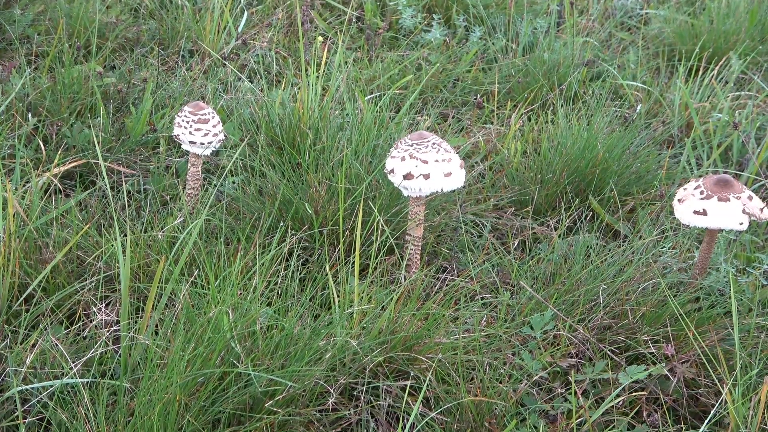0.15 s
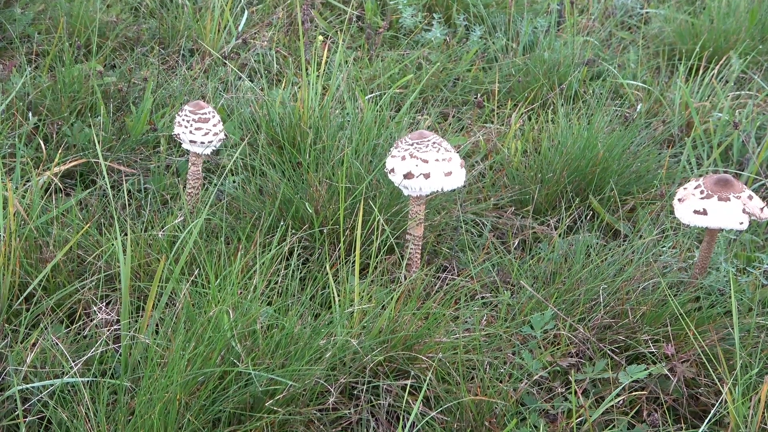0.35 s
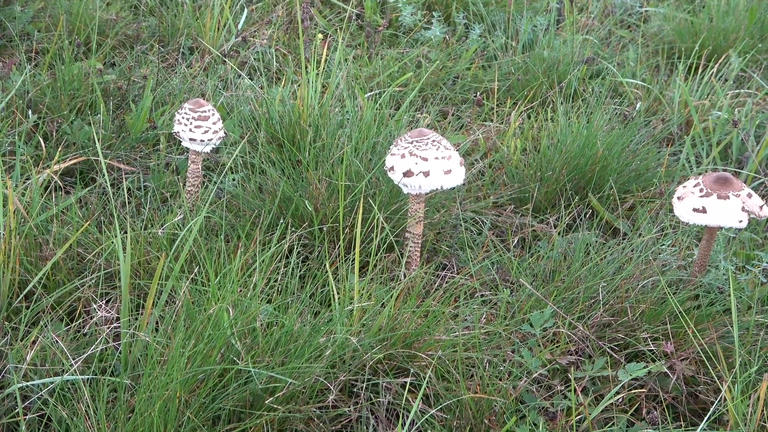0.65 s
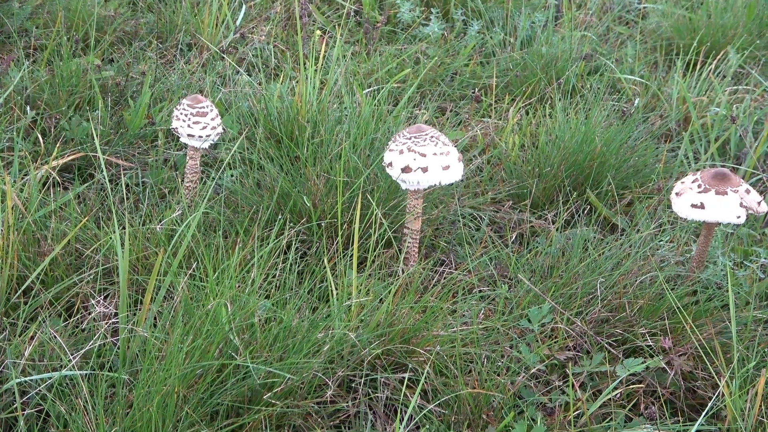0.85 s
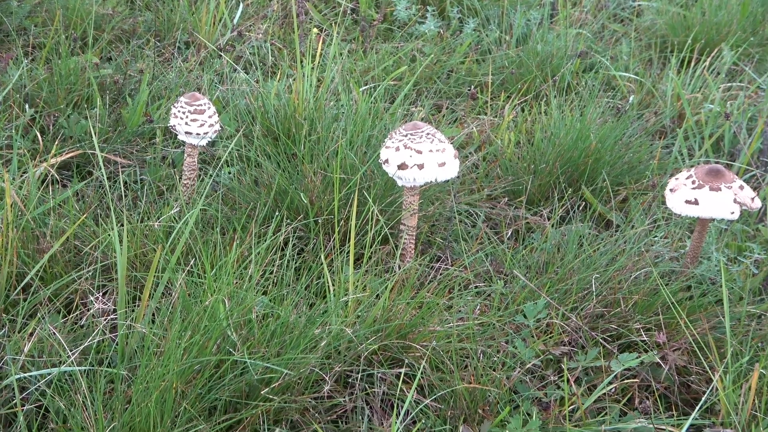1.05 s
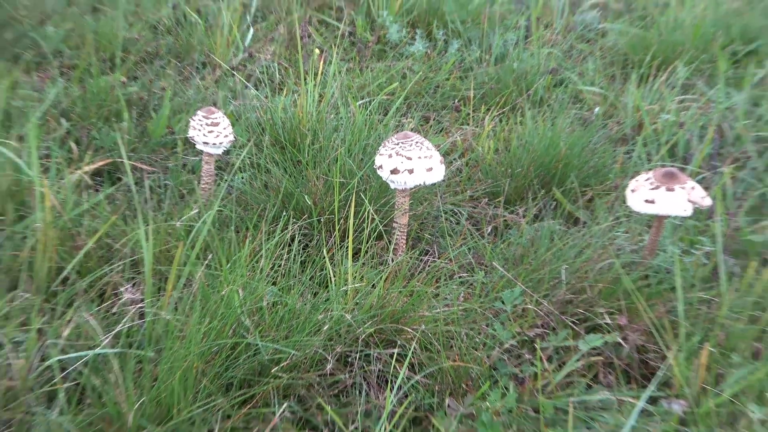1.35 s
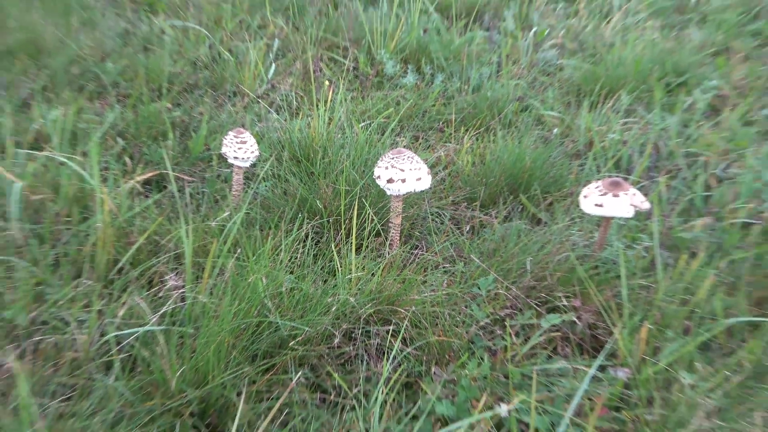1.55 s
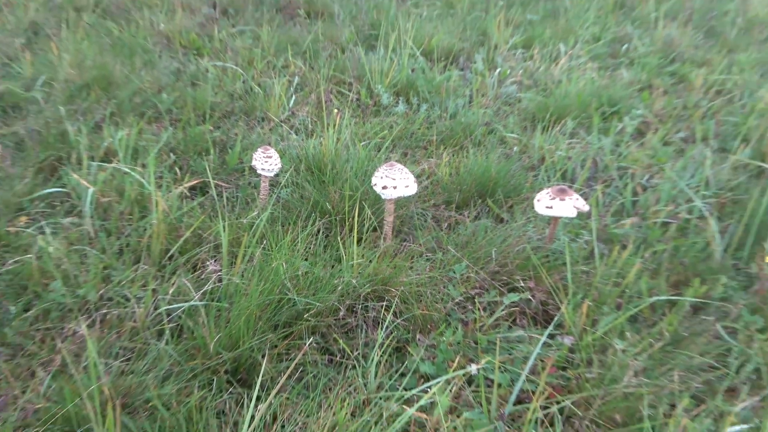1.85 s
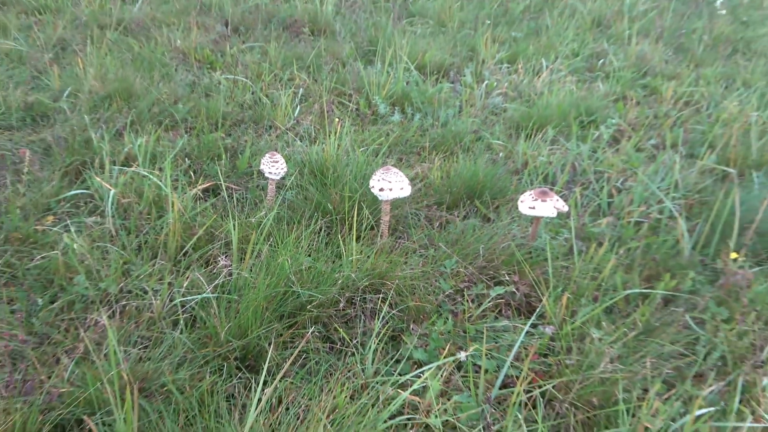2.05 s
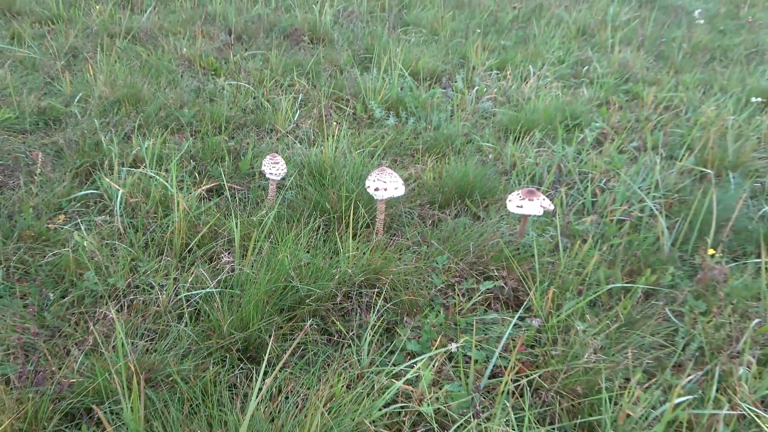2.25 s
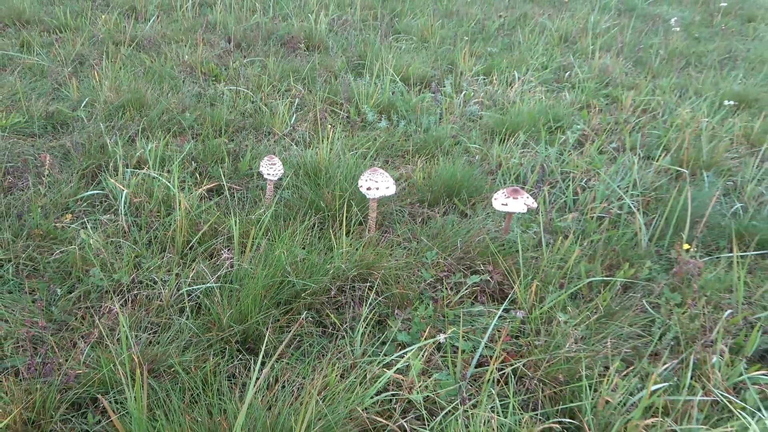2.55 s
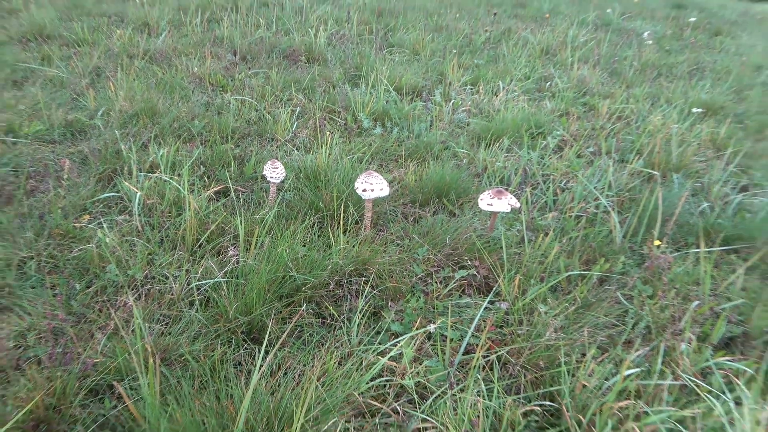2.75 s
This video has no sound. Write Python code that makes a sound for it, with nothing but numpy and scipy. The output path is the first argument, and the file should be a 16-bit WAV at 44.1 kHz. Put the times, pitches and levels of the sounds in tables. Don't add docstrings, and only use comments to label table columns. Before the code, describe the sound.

A rutting deer buck groans three times at moderate distance: about 0.2-0.7 s, 1.1-1.65 s, and a slightly longer one 2.0-2.65 s. Each is a low, hoarse rattle of 20-30 throat pulses per second, swelling then fading, with breathy rasp and a short woodland echo. Between them lie quiet meadow air, thin hiss, faint distant drone and a very faint high insect. The voice leans right.

```python
import sys
import numpy as np
from scipy import signal
from scipy.fft import rfft, irfft, next_fast_len
from scipy.io import wavfile
from scipy.ndimage import map_coordinates

SR = 44100
rng = np.random.default_rng(int(sys.argv[2]) if len(sys.argv) > 2 else 0)


def undo_db(level):
    steps = np.asarray(level, float) / 20
    return 10 ** steps


def master_out(mix):
    frames = np.transpose(np.atleast_2d(mix))
    ceiling = np.clip(frames, -1, 1)
    pcm = np.round(ceiling * 32767).astype(np.int16)
    wavfile.write(sys.argv[1], SR, pcm)


N = 127890


def unit(x):
    return x / np.sqrt(np.mean(x ** 2) + 1e-20)


def along(points, hz):
    point_hz, value = np.transpose(points)
    return np.interp(np.log(hz + 1), np.log(point_hz + 1), value)


def filtered(x, response):
    size = next_fast_len(N + SR // 2)
    spectrum = rfft(x, size)
    return irfft(spectrum * response(np.fft.rfftfreq(size, 1 / SR)), size)[..., :N]


def peaks(rows):
    def response(f):
        total = 0
        for k, (center, width, db) in enumerate(rows):
            damping = 1j * f * width
            total = total + (-1) ** k * undo_db(db) * damping / (center * center - f * f + damping)
        return total
    return response


def above(f):
    u = 1j * f / 106.3
    return (u * u / (1 + u + u * u)) ** 2


def pair(share, size=N):
    same, a, b = rng.standard_normal((3, size))
    share = np.clip(share, 0, 1)
    return np.sqrt(share) * same + np.sqrt(1 - share) * np.array([a, b])


def alike_below(x):
    return x + filtered(x[0] - x, lambda f: 1 / (1 + (f / 295) ** 4))


def wobble(rate):
    knots = rng.standard_normal(int(N * rate / SR) + 4)
    return map_coordinates(knots, [np.arange(N) * rate / SR])


def drone():
    # time_s, level_db
    hum_level = [(0.0, -45), (0.21, -47.5), (0.46, -35.5), (0.81, -57.5), (0.95, -49.5), (1.32, -48.5),
                 (1.44, -42), (1.93, -47.5), (2.38, -43.5), (2.66, -48), (2.79, -46.5), (2.9, -53.5)]
    # pitch_hz, width_hz, level_db
    hum_modes = [
        (123.3, 6.5, 1.5),
        (152, 15.4, -5),
        (217.6, 90, -18.5),
    ]
    s, db = np.transpose(hum_level)
    hum = filtered(rng.standard_normal(N), lambda f: peaks(hum_modes)(f) * above(f))
    return undo_db(np.interp(np.arange(N) / SR, s, db)) * unit(hum)


def insect():
    pitch_hz, width_hz, level_db = 5410, 6.6, -80
    line = filtered(rng.standard_normal(N), peaks([(pitch_hz, width_hz, 0)]))
    return undo_db(level_db) * unit(line)


def meadow(voice):
    # pitch_hz, level_db (per Hz)
    air_color = [(20, 8.5), (40, -6), (80, 4.5), (250, -4.5), (1000, -3.5), (1400, -10), (2000, -5.5),
                 (6000, -25.5)]
    # pitch_hz, level_db (per Hz)
    hiss_color = [(6600, -11), (7600, -13.5), (8700, -15.5), (9700, -8), (11000, 1), (12500, -13.5),
                  (13500, -25.5), (15700, -26)]
    air_db, shared_air, air_wobble_db = -52.5, 0.55, 1.1
    hiss_db, shared_hiss, hiss_wobble_db = -64, 0.71, 0.3
    swell_db, swell_s, air_swell_share = 4.5, 0.2, 0.5
    apart_hz = 12500

    air_curve = [*air_color, (6700, -28), (9000, -120)]
    air = unit(filtered(alike_below(pair(shared_air)), lambda f: undo_db(along(air_curve, f))))

    near, own = pair(shared_hiss), pair(0)
    hiss = near + filtered(own - near, lambda f: f > apart_hz)
    hiss_curve = [(3000, -120), *hiss_color]
    hiss = unit(filtered(hiss, lambda f: undo_db(along(hiss_curve, f))))

    fade = np.exp(-np.arange(SR) / SR / swell_s)
    loud = signal.fftconvolve(np.abs(voice), fade)[:N]
    swell = swell_db * np.abs(loud) / loud.max()
    air_level = air_db + air_swell_share * swell + air_wobble_db * wobble(5.686)
    hiss_level = hiss_db + swell + hiss_wobble_db * wobble(11.35)
    return undo_db(air_level) * air + undo_db(hiss_level) * hiss


def slaps():
    # time_s, slaps_so_far (count)
    rhythms = [
        [(.187, 0), (.3722, 4), (.5378, 9), (.5792, 10), (.637, 11), (.715, 13)],
        [(1.067, 0), (1.2267, 3), (1.325, 5), (1.4512, 8), (1.5435, 10), (1.6, 11), (1.66, 12)],
        [(2.033, 0), (2.136, 2), (2.222, 4), (2.3452, 8), (2.3836, 9), (2.412, 10), (2.4544, 11), (2.531, 13),
         (2.6415, 15)],
    ]
    # time_s, effort_db, chest_share_db, brightness (2 dB per octave per unit)
    efforts = [
        [(.187, -58, 13, 12), (.2335, -39.5, -1.5, 15.5), (.2794, -35, -1.5, 6), (.3258, -30.5, -3.5, 14.5),
         (.3722, -36.5, 5, -1.5), (.4066, -30, 0, 8.5), (.504, -35.5, -18.5, -2.5), (.5378, -36, -5, 1),
         (.715, -62.5, 8.5, -3)],
        [(1.067, -72, 17, -10), (1.173, -49, 5.5, 4), (1.275, -40.5, 6.5, 0), (1.325, -33, -0.5, -2.5),
         (1.368, -37, 7, -7), (1.4512, -34.5, 3.5, -3.5), (1.4966, -35, 2.5, 8), (1.6, -51, -6, 11),
         (1.66, -59.5, 11, 40)],
        [(2.033, -59.5, 11, 2), (2.083, -40, -2.5, 14), (2.136, -38.5, 1, -2), (2.18, -31.5, -0.5, 11),
         (2.345, -34.5, -1, -1.5), (2.454, -33.5, -1, 2.5), (2.531, -47, -3.5, 9), (2.586, -59.5, -13, -22),
         (2.6415, -51, 6, -0.5)],
    ]
    lead_s = 0.001515
    rows = []
    for rhythm, effort in zip(rhythms, efforts):
        s, passed = np.transpose(rhythm)
        when = np.interp(np.arange(passed[-1] + 1), passed, s) - lead_s
        t, *controls = np.transpose(effort)
        progress = (when - s[0]) / (s[-1] - s[0]) - .5
        rows += zip(when, *[np.interp(when, t, c) for c in controls], progress)
    return rows


def ring(modes, scatter_db, stretch, progress, bright_db, attack_s):
    hz, db, t60, change_db = np.transpose(modes)[..., None]
    t = np.arange(SR // 4) / SR
    luck = rng.standard_normal((2, len(modes), 1))
    db = db + change_db * progress
    tilt_db = bright_db * np.clip(np.log2(hz / 2250), -.4, .4) * (hz < 3500)
    gain = undo_db(db + scatter_db * luck[1] + tilt_db)
    gain = gain * np.linalg.norm(undo_db(db)) / np.linalg.norm(gain)
    pitch = hz * np.where(abs(hz - 250) < 90, stretch, 1) * (1 + 0.017 * luck[0])
    waves = np.sin(2 * np.pi * pitch * t)
    return (gain * undo_db(-60 * t / t60) * waves).sum(0) * (1 - np.exp(-(t / attack_s) ** 2))


def buck():
    # pitch_hz, level_db, t60_s (time to fade), change_db (through a groan)
    chest = [(120.2, -0.5, 0.1, 3.5), (143.7, -4.5, .14, -6.5), (167, -34, 0.14, 4),
             (223.2, 6.5, 0.083, -5), (292, -22, 0.087, 5), (365, -10, 0.1, -7), (528.7, -15.5, 0.19, 6),
             (608, -15, .12, -12.5), (818, -21, 0.13, -22), (1040.4, -10.5, 0.28, 6.5),
             (1089, -16, 0.17, -6)]
    # pitch_hz, level_db, t60_s (time to fade), change_db (through a groan)
    mouth = [(1275, -8, 0.056, -17), (1385, -22.5, 0.11, -42), (1772, 1.5, 0.049, 11),
             (1865, 1.5, 0.061, -22.5), (2055, 4, 0.039, 22), (2207.4, -0.5, 0.11, 2.5),
             (2303, -12.5, 0.051, 22), (2515, -14, 0.13, 15), (2743, 0, 0.043, 8), (2945, 2.5, 0.016, 5.5),
             (3904, -14.5, 0.035, 14), (4250, -17.5, 0.032, -3), (4743, -9.5, 0.02, 8),
             (5590, -21.5, 0.014, 16)]
    chest_level_db, chest_scatter_db, chest_attack_s = 3.5, 1.2, 0.0056
    mouth_level_db, mouth_scatter_db, mouth_attack_s = 4.5, 4, 0.0016
    chest_rise = 0.16
    rasp_db, rasp_t60_s = -3.5, 0.11
    dull_hz = 6200

    voice, puffs = np.zeros(N + SR), np.zeros(N + SR)
    t = np.arange(SR // 4) / SR
    for s, db, chest_db, bright_db, progress in slaps():
        stretch = 1 + chest_rise * progress
        low = ring(chest, chest_scatter_db, stretch, progress, 0, chest_attack_s)
        high = ring(mouth, mouth_scatter_db, 1, progress, 2 * bright_db, mouth_attack_s)
        slap = undo_db(chest_level_db + chest_db) * low + undo_db(mouth_level_db) * high
        start = round(s * SR)
        voice[start:][:len(t)] += undo_db(db) * slap
        puffs[start:][:len(t)] += undo_db(db - 60 * t / rasp_t60_s) * (1 - np.exp(-t / chest_attack_s))

    throat = peaks([(hz, 5.5 / t60 + 30, db) for hz, db, t60, change_db in mouth])
    rasp = undo_db(rasp_db) * puffs[:N] * unit(filtered(rng.standard_normal(N), throat))
    return filtered(voice[:N] + rasp,
                    lambda f: above(f) / (1 + 1.4j * f / dull_hz - (f / dull_hz) ** 2))


def trees(x):
    # pitch_hz, t60_s (time to fade)
    echo_fade = [
        (120, 1.78),
        (220, 0.12),
        (1000, 0.77),
        (2500, 0.29),
        (6000, 0.15),
    ]
    hz, t, z = signal.stft(pair(0.69, size=SR), SR, nperseg=256)
    fade = undo_db(-60 * t / along(echo_fade, hz)[:, None])
    tail = signal.istft(z * fade, SR, nperseg=256)[1]
    late = np.pad(x, (500, 0))[None]
    return signal.fftconvolve(late, tail / np.linalg.norm(tail[0]), axes=1)[:, :N]


def scene():
    voice = buck()
    echo = undo_db(-7) * alike_below(trees(voice))
    return voice + echo + drone() + insect() + meadow(voice)


def low_pass(x):
    return signal.sosfilt(signal.butter(12, 15620, fs=SR, output="sos"), x)


def record(dry):
    # pitch_hz, level_db
    left_level = [
        (60, 0.35),
        (250, 0.5),
        (400, -2.5),
        (1100, -10),
        (1900, -10),
        (2600, -7),
        (9500, 3),
        (11800, -12),
    ]
    # pitch_hz, turn (radians)
    left_turn = [(60, 0.7), (250, -0.79), (700, -0.87), (1100, 0.38), (2200, -0.14), (7000, 1),
                 (10000, -0.18), (15000, 0.94)]
    top_hz = 15720
    lag_s = 18 / 44100

    def left(f):
        level = undo_db(along([*left_level, (13500, 1)], f))
        turn = along(left_turn, f) - 2 * np.pi * f * lag_s
        return (f < top_hz) * level * np.exp(1j * turn)

    right = filtered(dry[1], lambda f: f < top_hz)
    return low_pass(np.array([filtered(dry[0], left), right]))


dry = scene()
out = record(dry)
master_out(out)
```